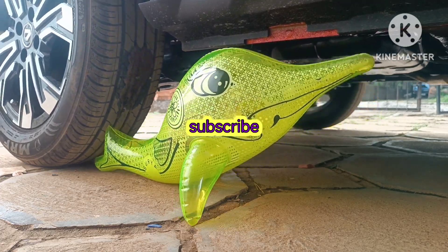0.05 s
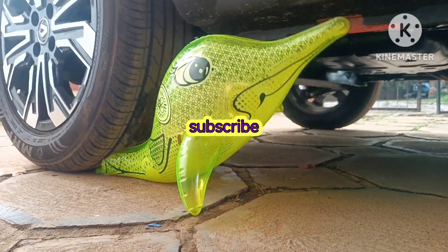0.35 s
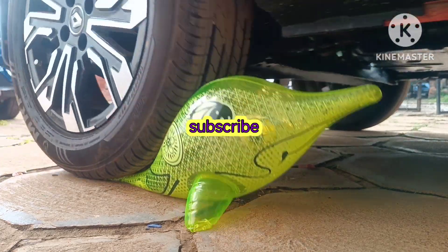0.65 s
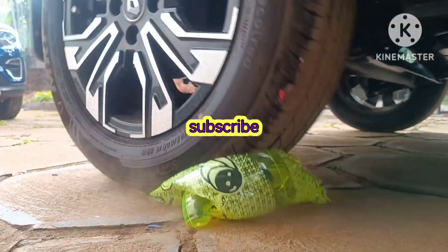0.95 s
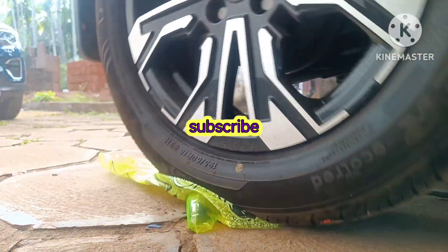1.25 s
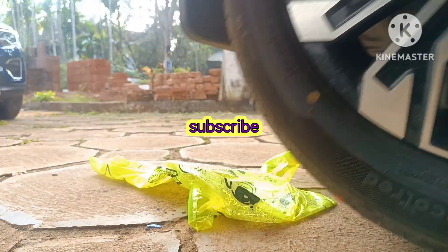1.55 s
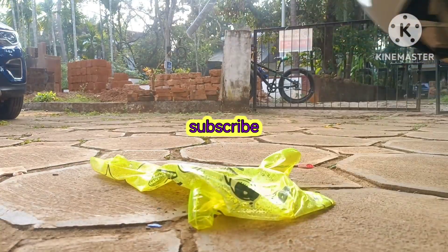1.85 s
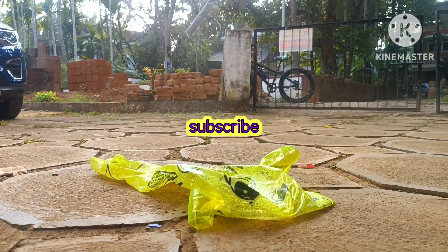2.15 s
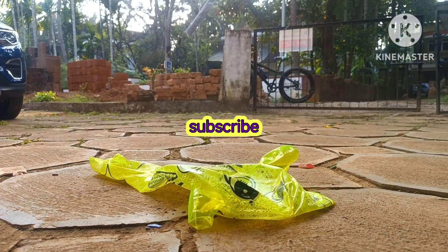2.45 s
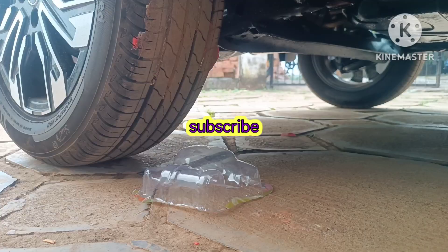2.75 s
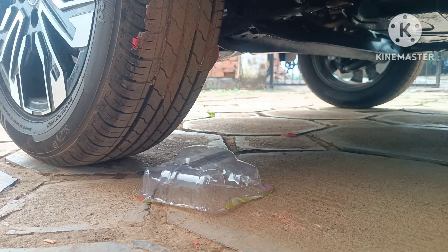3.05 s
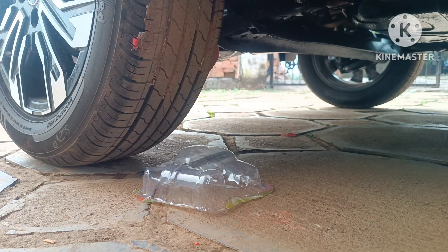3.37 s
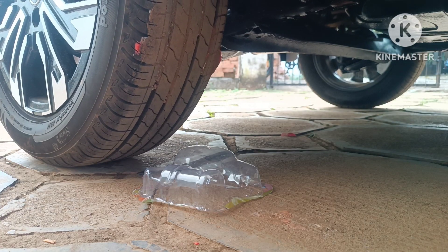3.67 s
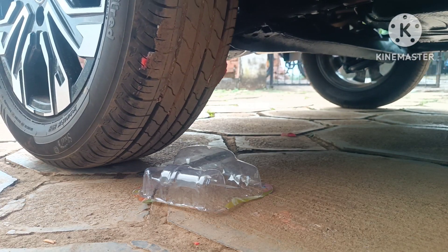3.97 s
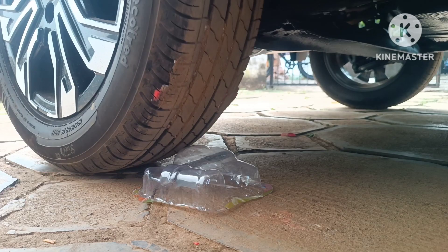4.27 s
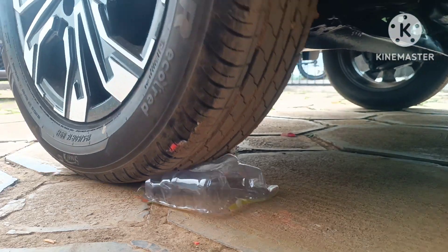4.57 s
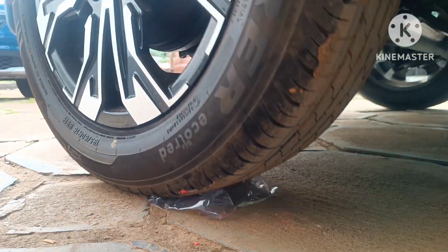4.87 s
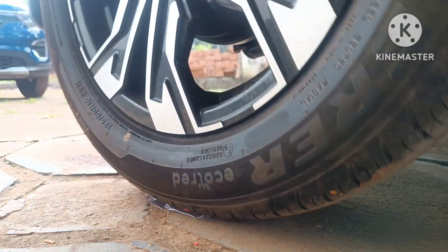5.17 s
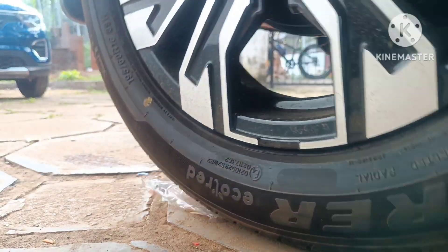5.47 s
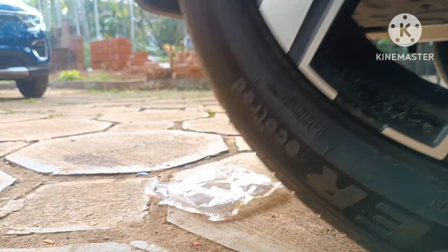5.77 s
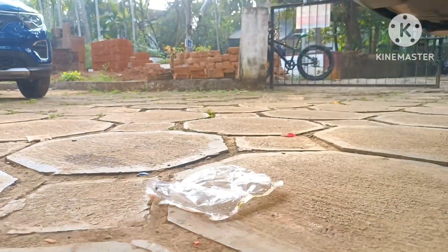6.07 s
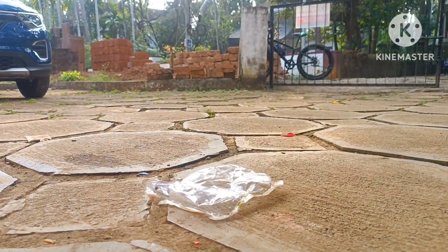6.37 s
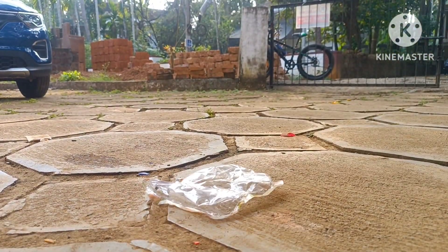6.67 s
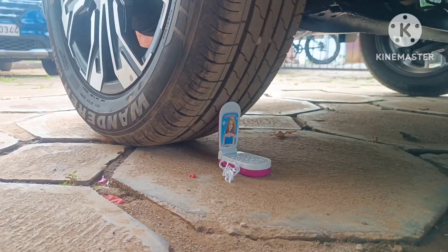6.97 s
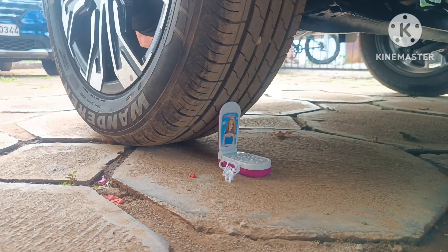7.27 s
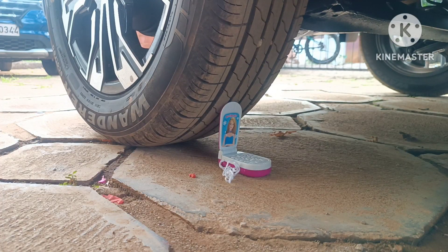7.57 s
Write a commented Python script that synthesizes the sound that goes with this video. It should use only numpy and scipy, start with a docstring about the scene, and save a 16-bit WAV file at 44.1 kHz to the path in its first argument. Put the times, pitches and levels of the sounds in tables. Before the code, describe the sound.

Over a running car engine, an inflatable toy squeaks and pops with a booming bang; later a plastic tray snaps and crackles flat.

```python
"""An inflatable toy squeaks under a creeping car's front tyre and bursts, overloading the microphone.
The tyre then flattens a thin plastic tray, its panels buckling snap by snap over a crackle of creases.
Grit ticks under the tread, the underbody clunks and the engine throbs throughout, joined by a whining
belt, a humming fan and one faint chirp. All is heard from beside the tyre in a paved yard, in three
passes parted by short silences."""
import sys
import numpy as np
from scipy import signal
from scipy.fft import rfft, irfft, next_fast_len
from scipy.io import wavfile
from scipy.ndimage import map_coordinates

SR = 44100
rng = np.random.default_rng(int(sys.argv[2]) if len(sys.argv) > 2 else 0)


def store_wav(level_fs):
    """Save 16-bit WAV to argv[1]."""
    pcm = np.round(np.clip(np.atleast_2d(level_fs), -1, 1) * 32767)
    wavfile.write(sys.argv[1], SR, pcm.T.astype(np.int16))


N = 340452
TIME = np.arange(N) / SR

BURST_S = 1.0275
# air ringing between tyre, ground and underbody: pitch_hz, level_db, t60_s
CAVITY_MODES = [(60.8, -12, 2.8), (144, -8.5, 3.3), (159, -2, 1.4), (198, -8, 1.9), (230, -6.5, 2.28),
                (267, -13, 1.7), (314, -8.5, 1.4), (372.6, -1, .85), (386, -5, .95), (447.5, -1.5, .78),
                (476, -6, .8), (517, -13.5, 1.3), (916, -12.5, 0.66), (1016, -13.5, .55)]
# the bang and its tail in the yard, by band: centre_hz, blast_db, blast_t60_s, tail_db, tail_t60_s
BLAST_BANDS = [(35, -36.5, 0.27, -41.5, 1.0), (70, -8, 0.36, -34, 1.1), (143.5, -5.5, 0.18, -9, 1.2),
               (292, 8, 0.17, -6, 1.14), (446, 3.5, 0.13, -17, 0.57), (990, -2.5, 0.12, -22, 0.95),
               (1805, -7.5, 0.066, -28.5, 0.8), (3596, -22, 0.14, -30, 0.6), (9200, -19.5, 0.17, -53, .3)]


def burst(shock_db=2, shock_s=.003, tear_db=2, tear_hz=3300, shreds_db=-19, cavity_db=-7, echo_s=.31):
    """The toy's skin tears: an N-shaped shock, a blast, the ringing space under the car, the yard."""
    age = TIME - BURST_S
    since = np.maximum(age, 0)
    noises = air(), air()
    shock = from_db(shock_db) * (1 - 2 * age / shock_s) * (age >= 0) * (age < shock_s)
    tear = from_db(tear_db) * dying(age, t60=.036) * unit_rms(band(noises[0], tear_hz / 1.7, tear_hz * 1.08))
    flapping = from_db(shreds_db + 4 * drift(300)) * dying(age, t60=.16)   # torn edges in escaping air
    out = shock + tear + flapping * unit_rms(band(noises[1], tear_hz / 2, tear_hz * 1.3))
    echo = 1 + from_db(-3) * swell_at(BURST_S + echo_s, .1)   # the walls return the boom
    blast_rise, tail_rise = 1 - dying(since, .007), 1 - dying(since, .02)
    for k, (hz, blast_db, blast_t60, tail_db, tail_t60) in enumerate(BLAST_BANDS):
        blast = from_db(blast_db) * dying(age, blast_t60) * blast_rise
        tail = from_db(tail_db) * dying(age, tail_t60) * tail_rise * echo
        noise = band(band(noises[k % 2], hz / 1.38, hz * 1.544), hz / 1.6, hz * 1.52)
        out += (blast + tail) * unit_rms(noise)
    for hz, db, t60 in CAVITY_MODES:
        build = 1 - dying(since, 5 / hz)   # deeper modes take longer to build up
        mode = np.sin(2 * np.pi * (hz * age + rng.random()))
        out += from_db(cavity_db + db) * build * dying(age, t60) * echo * mode
    return out


# the toy's squeaks: start_s, length_s, top_pitch_hz, whistle_db, rubbing_db
TOY_SQUEAKS = [(0.843, 0.17, 2730, -28.5, -34.5), (0.899, 0.14, 4540, -40.5, -50.5),
               (1.086, 0.071, 3430, -30.5, -56), (1.139, 0.075, 4500, -29.5, -58),
               (1.157, 0.062, 2370, -21.5, -52)]


def leak(sag_hz=170, waver_hz=130, hoarse=.85, stutter_db=2):
    """Air forced from the toy whistles in hoarse, stuttering arches over the hiss of rubbed skin."""
    out, rubbing = np.zeros((2, N)), 0
    waver = drift(900) + .4 * drift(70)
    rasp = 1 + hoarse * np.array([drift(340), drift(270)])
    stutter = drift(60)
    for start, length, top_hz, db, rubbing_db in TOY_SQUEAKS:
        arch = np.maximum(1 - (2 * (TIME - start) / length - 1) ** 2, 0)
        hz = top_hz - sag_hz * (1 - arch) + waver_hz * waver
        out += arch * from_db(db + stutter_db * stutter) * rasp * np.sin(2 * np.pi * np.cumsum(hz) / SR)
        rubbing += arch * from_db(rubbing_db)
    return out + rubbing * band(rng.standard_normal((2, N)), 3000, 16000)


# the tray's loudest buckles: start_s, ring_db, ring_hz, crack_db, crack_hz
BUCKLES = [(4.582, -12, 1580, -20, 5400), (4.595, -14, 1460, -18, 10500), (4.6198, -34, 1700, -23, 7000),
           (4.63, -9.5, 1770, -26.5, 5500), (4.6679, -11, 480, -16.5, 6500), (4.7049, -12, 1390, -43, 5000),
           (4.7132, -15.5, 1200, -17.5, 5500), (4.742, -20, 2010, -28, 5000),
           (4.754, -14.5, 1100, -24.5, 5300), (4.771, -18, 1200, -23, 6500),
           (4.776, -14.5, 1500, -20, 5200), (4.7876, -18, 1550, -24, 5000),
           (4.7933, -14.5, 2200, -26, 5700), (4.798, -11.5, 2170, -17, 9800),
           (4.831, -10.5, 900, -22, 5500), (4.8458, -9.5, 1350, -16, 5700), (4.865, -19, 2100, -24, 6000),
           (4.875, -11.5, 1010, -26, 5200), (4.904, -10.5, 1430, -18, 5200), (4.9158, -14, 2180, -20, 5200),
           (4.922, -13, 1900, -17, 7260), (4.9283, -15.5, 1400, -19, 5900), (4.939, -10.5, 2150, -21, 7760),
           (4.9457, -16, 1870, -19.5, 7700), (4.961, -27, 1900, -35, 6000), (4.9724, -21, 2000, -22, 8800),
           (4.978, -8, 1390, -24, 5900), (4.9833, -18, 1640, -21, 7400), (4.989, -7, 1860, -17.5, 6400),
           (4.994, -10.5, 1100, -27, 6400), (4.9986, -19, 1740, -31, 5200), (5.0033, -18, 2900, -34, 5500),
           (5.007, -21, 1830, -26, 5530), (5.0258, -18, 1400, -18, 5000), (5.03, -17, 1350, -28, 5000),
           (5.043, -19, 1700, -35, 5500), (5.0523, -10.5, 1320, -19.5, 11000),
           (5.067, -16.5, 2180, -26, 10000), (5.072, -12, 1620, -26, 5000), (5.087, -20, 1870, -13.5, 6470),
           (5.121, -15, 2090, -20, 6400), (5.1402, -19, 1950, -23, 5000), (5.155, -12, 1950, -17.5, 7440),
           (5.171, -15, 2500, -19, 6000), (5.184, -20, 2500, -29, 7000), (5.207, -15, 2550, -23, 7900),
           (5.2103, -16, 2750, -22, 7900), (5.224, -11, 1910, -19, 9100), (5.2332, -24, 2600, -20, 5000),
           (5.2431, -18, 2100, -20, 7600), (5.262, -16, 2800, -18, 8300), (5.2726, -12.5, 2500, -26, 7700),
           (5.2758, -10, 2380, -22, 8000), (5.2818, -23, 2500, -23, 5000), (5.2987, -24, 3300, -20.5, 5190),
           (5.314, -24, 2700, -29, 8000), (5.3245, -23, 3300, -25, 8000), (5.343, -17.5, 2930, -23, 4800),
           (5.3537, -21, 2700, -19.5, 5000), (5.3784, -25, 1950, -24, 6500),
           (5.4025, -18, 4300, -23.5, 5500), (5.452, -25, 1810, -25, 4800), (5.4798, -17, 2000, -22, 5030),
           (5.4875, -21, 2200, -26, 7000), (5.5343, -19, 1590, -22.5, 5300), (5.543, -19, 1700, -38, 5000),
           (5.549, -20.5, 2100, -21, 12500), (5.5675, -26, 1467, -26, 4800),
           (5.606, -18.5, 2140, -21.5, 9000), (5.6172, -17.5, 3300, -30, 5200),
           (5.621, -20, 2200, -31, 6000), (5.6504, -22.5, 1740, -24, 6700),
           (5.8807, -23, 1920, -32.5, 4984)]
# the tray gives way in two crunches, then crinkles as it springs back: start_s, end_s, level_db
TRAY_CRUNCHES = [(4.56, 5.047, -23.5), (5.17, 5.255, -23.5), (5.31, 5.64, -31)]
# its panels ring higher as they fold smaller: time_s, pitch_hz
PANEL_PITCH = [(4.7, 990), (5.25, 2550)]


def tray(small_snaps_per_s=11, small_crack_hz=7000, lag_s=.00011):
    """The tray collapses in loud and lesser buckles over a crackle that climbs in pitch."""
    out = np.zeros((2, N))
    panel_hz, = in_time(PANEL_PITCH)
    for start, *buckle in BUCKLES:
        add(out, start, snap(start, *buckle))
    for start, end, db in TRAY_CRUNCHES:
        for slot in np.arange(start, end, 1 / small_snaps_per_s):
            s = slot + rng.random() / small_snaps_per_s
            ring_db, crack_db = db + np.array([-3.5, -7]) + 2 * rng.standard_normal(2)
            ring_detune, crack_detune = 2 ** rng.uniform(-.61, .45, 2)
            ring_hz = 1.2 * panel_hz[int(s * SR)] * ring_detune
            add(out, s, snap(s, ring_db, ring_hz, crack_db, small_crack_hz * crack_detune))
    out += creases(panel_hz)
    return np.array([np.interp(TIME - lag_s, TIME, out[0]), out[1]])   # a little to the right


def snap(start, ring_db, hz, crack_db, crack_hz, ring_cycles=10.5, stiffest_hz=4500, flutter_db=-14.5):
    """One buckle: panels ring hollowly under a sharp crack, and the sheet flexes and flutters."""
    age = TIME[:SR // 16]
    drive, splinters = rng.standard_normal((2, 2, len(age)))
    kick = (age == 0) + .08 * drive * dying(age, .02)
    pitches = hz * 2 ** (np.linspace(-.55, .45, num=3) + rng.normal(0, .12, 3))
    pitches /= (1 + (pitches / stiffest_hz) ** 4) ** .25
    panels = sum((-1) ** k * ring(kick * rng.uniform(.5, 1.5, (2, 1)), pitch, ring_cycles / pitch)
                 for k, pitch in enumerate(pitches))
    panels = band(panels, hz / 1.23, hz * 3)
    spike = (age == 0) + .2 * splinters * dying(age, .026)   # one click, then fine splintering
    crack = band(spike + .3 * ring(spike, crack_hz, 6 / crack_hz), 3700, 15500) * from_db([[-1], [1]])
    flutter = band(rng.standard_normal(drive.shape), hz, min(hz * 2.3, stiffest_hz))
    flutter = band(flutter, hz / 2, 15000) * dying(age, t60=.09)
    flex = band(band(drive, 200, 638.4), 210, 840) * dying(age, t60=.018)
    flex_db = -7 - 24 * (start - TRAY_CRUNCHES[0][0])   # the hollow tray thumps less as it flattens
    parts = (ring_db, panels), (crack_db, crack), (ring_db + flutter_db, flutter), (ring_db + flex_db, flex)
    return sum(from_db(db) * x / np.std(x[:, :SR // 200]) for db, x in parts)   # levelled on the first 5 ms


def creases(panel_hz, per_s=1000, ring_cycles=13, scatter_octaves=.81, width_octaves=.67, bright_db=-16):
    """Tiny creases crackle densely, each a click ringing at its own pitch around that of the panels."""
    out = np.zeros((2, N))
    level_db = crunch_level() - 2 + 2 * drift(35)
    at = np.flatnonzero((rng.random(N) < per_s / SR) & (TIME > TRAY_CRUNCHES[0][0]))
    size_db = .5 * np.minimum(rng.exponential(1, len(at)), 3.5)
    sizes = unit_rms(from_db(size_db)) * from_db(level_db[at])
    own_hz = panel_hz[at] * 2 ** rng.normal(0, scatter_octaves, len(at))
    for hz in np.geomspace(350, 14000, num=20):
        share = np.exp(-.5 * (np.log2(hz / own_hz) / width_octaves) ** 2)
        share += from_db(bright_db) * (hz > own_hz)
        clicks = np.zeros((2, N))
        clicks[:, at] = sizes * share * (rng.normal(0, .91, len(at)) + rng.normal(0, .98, (2, len(at))))
        # small panels radiate little below their own pitch
        out += band(ring(clicks, hz, ring_cycles / hz), hz / 1.066, hz * 4.1) * np.sqrt(hz / per_s)
    return out


def crunch_level(attack_s=.012, release_t60=.16, growth_db_per_s=.5):
    """Creasing level in dB: each crunch bites, grows as the tyre bears down, and dies away."""
    gain = 0
    for start, end, db in TRAY_CRUNCHES:
        growth_db = growth_db_per_s * (np.clip(TIME, start, end) - (start + end) / 2)
        attack = np.clip((TIME - start) / attack_s, 0, 1)
        gain += from_db(db + growth_db) * attack * dying(np.maximum(TIME - end, 0), release_t60)
    return 20 * np.log10(gain + 1e-9)


# the engine's pace: time_s, firing_hz
FIRING_RATE = [(0, 48.3), (.6, 48.14), (.75, 44.67), (1, 47.1), (1.5, 41.77), (2, 40.57), (3.5, 40.71),
               (3.75, 38.38), (4.3, 48.92), (4.6, 51.58), (5.9, 40.85), (6.3, 43.33), (6.7, 37.86),
               (7.72, 39.76)]
# the car is louder the closer it rolls: time_s, level_db
CLOSENESS = [(0, -27.5), (.85, -27.5), (1.3, -28), (2.64, -36.5), (3.0, -37), (4.53, -29), (5.7, -31),
             (6.85, -36.5), (7.72, -36)]
# balance against the belts' whirr, one row per pass: drone_db, hiss_db
PASS_BALANCE = [(-1, -11.5), (-2.5, -11), (0.5, -9.5)]
# colours of the low drone, the belts' whirr and the top hiss: frequency_hz, density_db
DRONE_COLOUR = [(95, -6), (140, -5), (195, -5), (270, -5), (335, -10.5), (410, -9.5), (520, -12), (600, -7),
                (670, -11.5), (730, -10), (900, -15.5), (1200, -45.5)]
WHIRR_COLOUR = [(440, -11.5), (750, -5), (1020, -2.5), (1170, -1), (1310, 1), (2310, -3), (2830, -7.5),
                (3060, -5.5), (3260, -7), (4510, -21), (4800, -26), (6240, -29), (10600, -120)]
HISS_COLOUR = [(3200, -8), (4000, -5), (5000, -8), (6500, -7), (8200, -10.5), (12300, -12), (15500, -12.5)]
# hollows under the body, against the drone: centre_hz, width_hz, level_db
BODY_HOLLOWS = [(230, 33, -12), (410.4, 35, -10.5), (490.7, 24, -10), (603.7, 50, -8)]
# engine bay resonances, against the whirr: centre_hz, width_hz, level_db
BAY_RESONANCES = [(1190, 59, -12), (1360, 190, -11), (2120, 130, -14), (2344, 170, -9.5), (2638, 130, -16),
                  (4420, 230, -22), (6760, 1300, -28.5)]


def engine(throb=.3, tick=.051, knock_db=-5, unsteady=.00892, lag_s=.00045, pan_db=.64):
    """Firings drive the exhaust, knock on the block and pulse the noise of belts and valves."""
    firing_hz, = in_time(FIRING_RATE)
    firings = np.cumsum(firing_hz * (1 + unsteady * drift(9))) / SR
    pulse = np.cos(2 * np.pi * firings)
    notes = exhaust(firings)
    # the hollows swell and fade as the car shifts over the ground
    hollows = sum(from_db(db + 1.8 * drift(6)) * resonance(rng.standard_normal(N), hz, width)
                  for hz, width, db in BODY_HOLLOWS)
    # every firing sets off the same short rattle, each with its own strength
    kicks = np.diff(np.floor(firings), prepend=0) * (1 + .32 * drift(45))
    rattle = (air(DRONE_COLOUR) * dying(TIME, t60=.088))[:, :SR // 8]
    knock = from_db(knock_db) * unit_rms(signal.fftconvolve(kicks[None], rattle, axes=1)[:, :N])
    near_db, = in_time(CLOSENESS)
    which_pass = sum(TIME > start for start, *_ in PASS_FADES[1:])
    drone_db, hiss_db = np.array(PASS_BALANCE)[which_pass].T
    drone = from_db(near_db + drone_db) * (air(DRONE_COLOUR) * (1 + throb * pulse) + knock + hollows)
    white = air()
    bay = sum(from_db(db + 2 * drift(6.8)) * resonance(white, hz, width)
              for hz, width, db in BAY_RESONANCES)
    whirr = from_db(near_db + .3 + 1.45 * drift(25)) * (air(WHIRR_COLOUR) + bay)
    hiss = from_db(near_db + hiss_db) * air(HISS_COLOUR)
    left, right = notes + drone + (whirr + hiss) * (1 + tick * pulse)
    # the engine lies off to the left, so it reaches the right side later
    return np.array([left * from_db(pan_db), np.interp(TIME - lag_s, TIME, right) * from_db(-pan_db)])


# exhaust loudness: time_s, level_db
EXHAUST_LEVEL = [(0, -28.5), (.7, -36), (1.9, -35), (2.64, -40), (4.5, -46), (5.0, -49), (5.5, -45.5),
                 (7.72, -44)]
# balance of its three notes: low_db, middle_db, high_db
NOTE_BALANCE = (-4.5, -0.5, -9.5)
# brief booms: centre_s, half_width_s, low_lift_db, middle_lift_db, high_lift_db
EXHAUST_BOOMS = [(.53, 0.25, 0, -4, 17), (1.598, 0.99, 2, 7, 9.4), (2.42, 0.11, 6, -8.5, 12),
                 (4.05, 0.18, -8, 8, 9.4), (4.29, 0.077, 15, 1, 2), (7.63, 0.084, 13.5, 10.5, 3.7)]


def exhaust(firings, wobble=.55):
    """The exhaust sounds three wobbling notes at 1.5, 2 and 3 times the firing rate."""
    lifts_db = sum(np.outer(lift_db, swell_at(s, width)) for s, width, *lift_db in EXHAUST_BOOMS)
    levels_db = in_time(EXHAUST_LEVEL)[0] + np.array(NOTE_BALANCE)[:, None] + lifts_db
    out = 0
    for ratio, db in zip((1.5, 2, 3), levels_db):
        note = np.sqrt(2) * np.sin(2 * np.pi * (ratio * firings + rng.random() + .1 * drift(14)))
        out += from_db(db) * note * (1 + wobble * drift(22))
    return out


# the drive's whine under load: starting_pitch_hz, level_db
LOAD_TONES = [(402, -30.5), (585, -37), (690, -36)]


def labour(build_s=.43, rise_share_per_s=.075):
    """The drive whines hoarsely, rising a little, while the tyre pushes against the toy."""
    load = np.interp(TIME, (0, build_s, BURST_S, BURST_S + .1), (.41, .98, .42, .029))
    clock = np.cumsum(1 + rise_share_per_s * TIME + .01 * drift(25)) / SR
    out = 0
    for hz, db in LOAD_TONES:
        gain = from_db(db) * (1 + .5 * drift(30))
        out += gain * np.sin(2 * np.pi * (hz * clock + .22 * drift(18)))
    return load * out


# colour of the rumble: frequency_hz, density_db
RUMBLE_COLOUR = [(70, -16), (120, 0), (170, -4), (225, -7), (300, -13)]


def rumble(centre_s=4.14, half_width_s=.16, level_db=-31):
    """The car rumbles roughly as it pulls away toward the tray."""
    return from_db(level_db) * swell_at(centre_s, half_width_s) * air(RUMBLE_COLOUR)


# knocks from under the car: start_s, clank_db, thud_db
BODY_CLUNKS = [(3.345, -20, -33), (3.359, -31, -24), (3.433, -25.5, -40), (3.455, -19.5, -28),
               (7.205, -30.5, -46), (7.262, -31, -46), (7.5136, -20.5, -13), (7.548, -30, -9.5),
               (7.607, -28, -20)]
# ring of the metal parts: pitch_hz, level_db, t60_s
METAL_MODES = [(630, -7, .05), (2280, -2, .014), (3500, 1, 0.0098), (3810, 5.5, 0.014), (4370, -10, .009),
               (6070, 1, .005), (7900, -10, .0056)]


def underbody(rattle_t60=.14, rasp_db=2, tick_db=-6, thud_hz=165):
    """Brake and suspension parts clank with a dry rattle, each in its own colour, over a dull thud."""
    out, age = np.zeros((2, N)), TIME[:SR // 4]
    for start, clank_db, thud_db in BODY_CLUNKS:
        rattle = rng.standard_normal((2, len(age))) * dying(age, rattle_t60)
        metal = sum(from_db(rng.normal(db, 2)) * ring(rattle, hz * rng.normal(1, .008), t60)
                    for hz, db, t60 in METAL_MODES)
        rasp = band(rattle, 250, 3440)
        tick = band(rng.standard_normal(rattle.shape), 3600, 11400) * dying(age, t60=.05)
        clank = unit_peak(metal) + from_db(rasp_db) * unit_peak(rasp) + from_db(tick_db) * unit_peak(tick)
        thud = band(ring(age == 0, thud_hz, t60=.04), 88, 900)
        add(out, start, from_db(clank_db) * clank + from_db(thud_db) * thud)
    return out


# grains cracking under the tread: start_s, level_db, pitch_hz
GRAINS = [(4.096, -15.5, 9200), (5.851, -26, 6040), (5.981, -18.5, 5200), (6.344, -28, 3810),
          (6.395, -24, 3334), (6.741, -11.5, 13500)]


def grit(lift_db=2, ring_cycles=9, scratch_db=-9, scratch_t60=.037):
    """Single grains split with a short bright tick and a duller scratch."""
    out, age = np.zeros((2, N)), TIME[:SR // 20]
    for start, db, hz in GRAINS:
        tick = band(ring(age == 0, hz, ring_cycles / hz), hz / 1.8, hz * 1.7)
        scratch = band(rng.standard_normal((2, len(age))) * dying(age, scratch_t60), hz / 5, hz * 1.3)
        grain = unit_peak(tick) + from_db(scratch_db) * unit_peak(scratch)
        add(out, start, from_db(db + lift_db) * grain)
    return out


# the fan's hum, shifting as the car rolls past: pitch_hz, level_db, change_db_per_s, waver_db
FAN_HUM = [(140, -5, 0.5, 1.5), (245.4, -4.5, 0, 0.5), (280.5, 4.2, -0.6, 1.2), (490, -7, -3, 0.5),
           (564, 5.5, -8.5, 3), (802, -15.5, 4.5, -1), (1394, -10.5, 0.5, 0.5)]


def fan_and_belt(fan_on_s=4.84, fade_in_s=.25, fan_db=-39.5, belt_on_s=2.8, belt_db=-48, belt_hz=3047):
    """The cooling fan hums late in the second pass; a belt whines thinly, sings out and fades."""
    fan_age, belt_age = np.maximum(TIME - fan_on_s, 0), TIME - belt_on_s
    running = np.minimum(fan_age / fade_in_s, 1) * (TIME < PASS_FADES[2][0])
    clock = TIME + np.cumsum(.0029 * drift(9)) / SR   # both waver in pitch together
    hum = sum(from_db(db + db_per_s * fan_age + waver_db * drift(7)) * np.sin(2 * np.pi * hz * clock)
              for hz, db, db_per_s, waver_db in FAN_HUM)
    whine_db = belt_db - 2.5 * belt_age + 4 * swell_at(3.25, .09) + 1.5 * drift(30)
    whine = (belt_age > 0) * from_db(whine_db) * np.sin(2 * np.pi * belt_hz * clock)
    return np.sqrt(2) * (from_db(fan_db) * running * hum + whine)


def chirp(start_s=7.085, length_s=.051, top_hz=3850, fall_hz_per_s=23000, blur_hz=220, level_db=-33):
    """One short, blurred falling chirp, perhaps a bird."""
    age = np.clip(TIME - start_s, 0, length_s)
    turns = np.cumsum(top_hz - fall_hz_per_s * age + blur_hz * drift(500)) / SR
    envelope = np.sin(np.pi * age / length_s) * dying(age, t60=.7)
    return from_db(level_db) * envelope * np.sin(2 * np.pi * turns)


def yard(x, wet_db=-14, t60=.22):
    """Add short scattered reflections from the paving and the underside of the car."""
    tail = band(rng.standard_normal((2, SR // 3)), 170, 9000) * dying(TIME[:SR // 3] - .003, t60)
    tail /= np.sqrt(np.sum(tail ** 2) / 2)
    return x + from_db(wet_db) * signal.fftconvolve(x, tail, axes=1)[:, :N]


# brief dips in the running car and the squeaks: centre_s, half_width_s, depth_db
LEVEL_DIPS = [(1.02, 0.0055, -14.5), (1.2, 0.094, -7.5), (4.9, 0.13, -5), (5.105, 0.033, -14),
              (5.16, 0.064, -11.5), (5.293, .027, -14), (5.35, .06, -3.5), (6.755, 0.017, -14),
              (6.88, .035, -5)]


def dips():
    """A gain that ducks briefly and comes back."""
    return from_db(sum(db * swell_at(s, width) for s, width, db in LEVEL_DIPS))


# how alike left and right sound: frequency_hz, correlation
STEREO_LIKENESS = [(50, 0.96), (130, 1), (260, 0.99), (500, 0.71), (1000, 0.44), (2000, 0.49), (4000, 0.13),
                   (14000, 0.065)]


def air(colour=None):
    """Stereo noise at rms 1, centred in the bass and wide in the treble, optionally coloured."""
    size = next_fast_len(N)
    hz = np.fft.rfftfreq(size, 1 / SR)
    mid, side = rfft(rng.standard_normal((2, size)))
    alike = at_hz(STEREO_LIKENESS, hz)
    spectrum = np.sqrt(1 + alike) * mid + np.sqrt(1 - alike) * side * [[1], [-1]]
    if colour is not None:
        roll_off = np.sqrt((1 + (colour[0][0] / (hz + 1)) ** 8) * (1 + (hz / colour[-1][0]) ** 8))
        spectrum *= from_db(at_hz(colour, hz)) / roll_off
    return unit_rms(irfft(spectrum, size)[:, :N])


def from_db(db):
    """Decibels to gain."""
    return 10 ** (np.asarray(db) / 20)


def unit_rms(x):
    """Scale to rms 1."""
    return x / np.sqrt(np.mean(x ** 2) + 1e-20)


def unit_peak(x):
    """Scale to peak 1."""
    return x / np.abs(x).max()


def in_time(rows):
    """Each column of a curve at every sample."""
    times, *columns = np.transpose(rows)
    return [np.interp(TIME, times, column) for column in columns]


def at_hz(points, hz):
    """Read a curve on a log-frequency axis."""
    frequencies, values = np.transpose(points)
    return np.interp(np.log(np.maximum(hz, 1)), np.log(frequencies), values)


def drift(per_s):
    """Smooth random wander with a spread of about 1."""
    knots = rng.standard_normal(4000)
    return map_coordinates(knots, [TIME[::20] * per_s], order=3, mode="wrap").repeat(20)[:N]


def swell_at(centre_s, half_width_s):
    """A bell-shaped swell to 1."""
    return np.exp(-((TIME - centre_s) / half_width_s) ** 2)


def dying(age, t60):
    """Exponential decay, silent before age 0."""
    return (age >= 0) * np.exp(-np.log(1000) * np.maximum(age, 0) / t60)


def band(x, low_hz, high_hz):
    """Causal band-pass."""
    edges_hz = [max(low_hz, 10), min(high_hz, .45 * SR)]
    return signal.sosfilt(signal.butter(2, edges_hz, "band", fs=SR, output="sos"), x + 1e-18)


def resonance(noise, hz, width_hz):
    """A narrow band of the noise at rms 1."""
    return unit_rms(band(noise, hz - width_hz / 2, hz + width_hz / 2))


def ring(drive, hz, t60):
    """One mode: a unit click sets a sine of height 1 ringing."""
    radius, angle = from_db(-60 / (t60 * SR)), 2 * np.pi * min(hz, .45 * SR) / SR
    return signal.lfilter([np.sin(angle), 0], [1, -2 * radius * np.cos(angle), radius ** 2], drive + 1e-18)


def add(out, start_s, sound):
    """Mix a short sound in."""
    at = int(start_s * SR)
    out[:, at:at + sound.shape[-1]] += sound[..., :N - at]


def scene():
    """Toy, tray and car, all close to the ground, and one chirp."""
    car_and_squeaks = (engine() + labour() + rumble() + fan_and_belt() + leak()) * dips()
    return burst() + yard(tray() + grit() + underbody()) + car_and_squeaks + chirp()


# the three passes: start_s, end_s, fade_in_s, fade_out_s
PASS_FADES = [(-.1, 2.735, .05, .08), (2.86, 6.935, .14, .02), (7.08, 7.8, .1, .02)]


def record(dry, knee=11, cutoff_hz=15650):
    """The microphone overloads, each pass fades in and out, and the top is cut."""
    clipped = dry / (1 + np.abs(dry) ** knee) ** (1 / knee)
    fades = sum(np.clip((TIME - start) / rise, 0, 1) * np.clip((end - TIME) / fall, 0, 1)
                for start, end, rise, fall in PASS_FADES)
    return signal.sosfilt(signal.ellip(10, .1, 70, cutoff_hz, fs=SR, output="sos"), clipped * fades)


dry = scene()
out = record(dry)
store_wav(out)
```